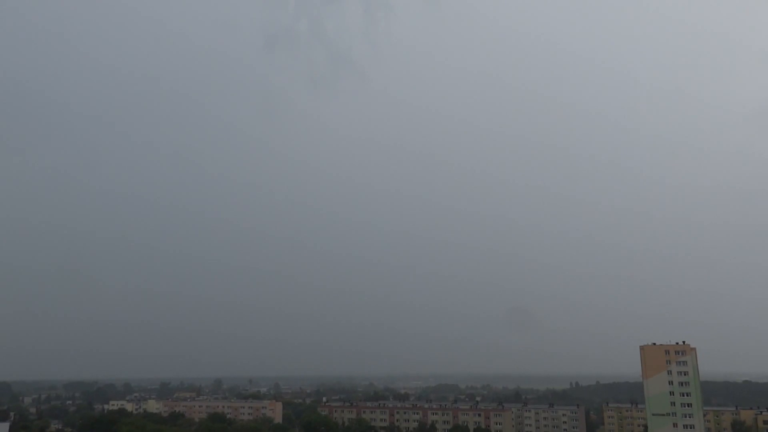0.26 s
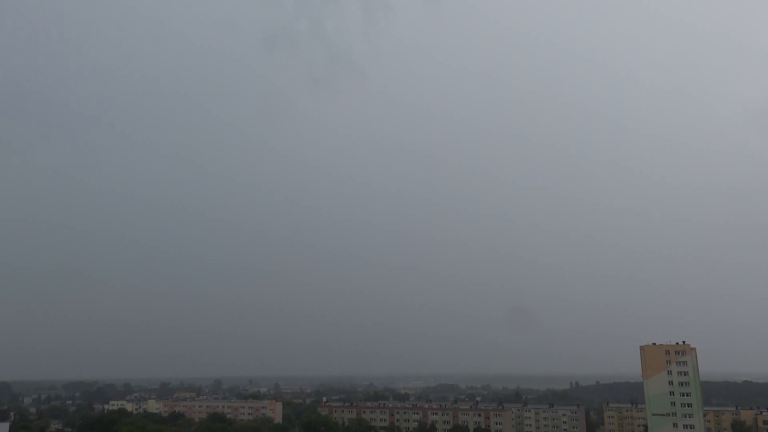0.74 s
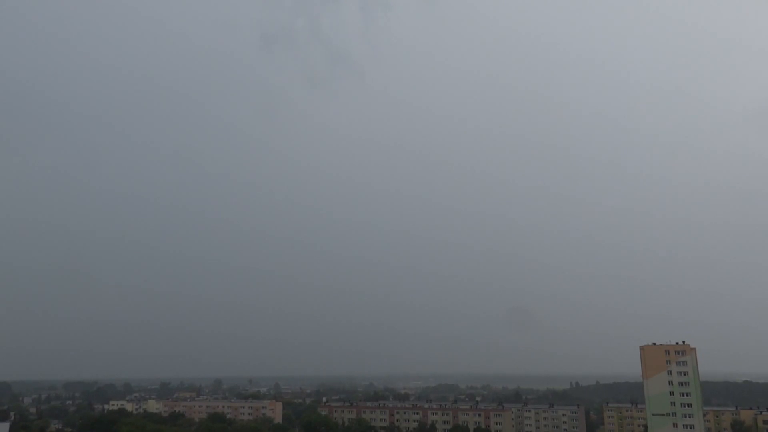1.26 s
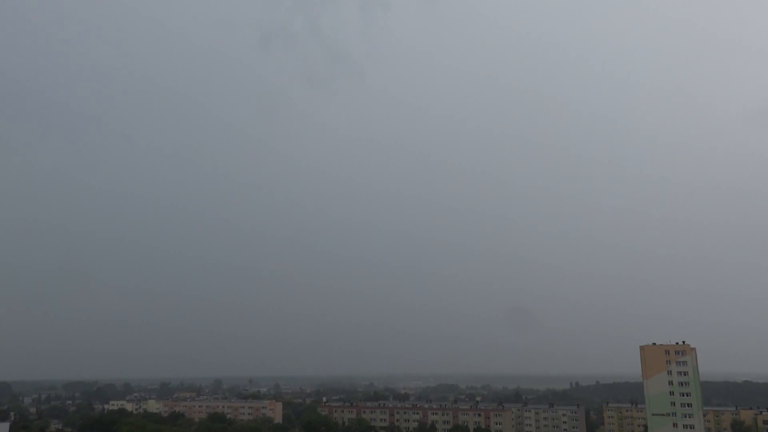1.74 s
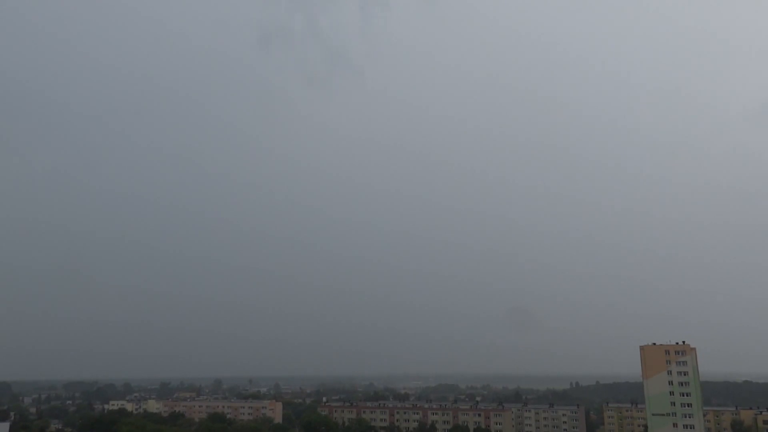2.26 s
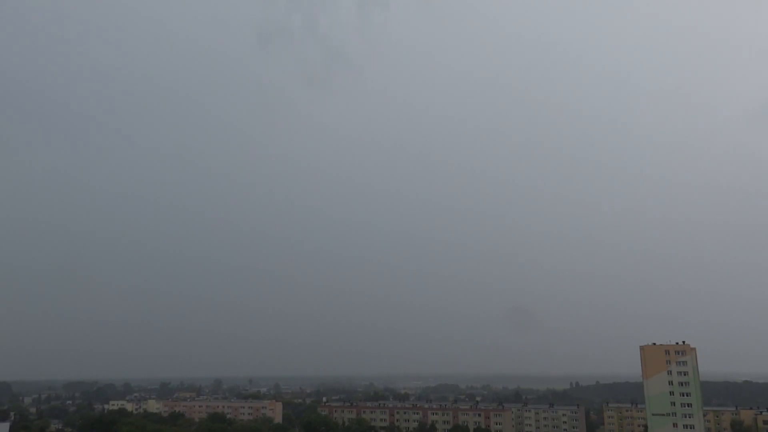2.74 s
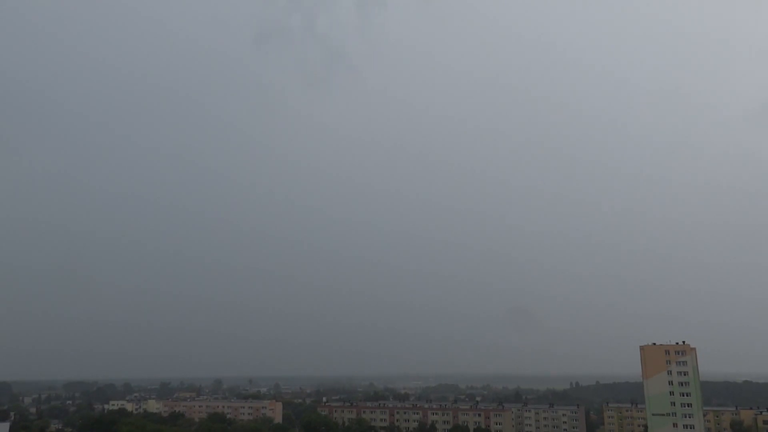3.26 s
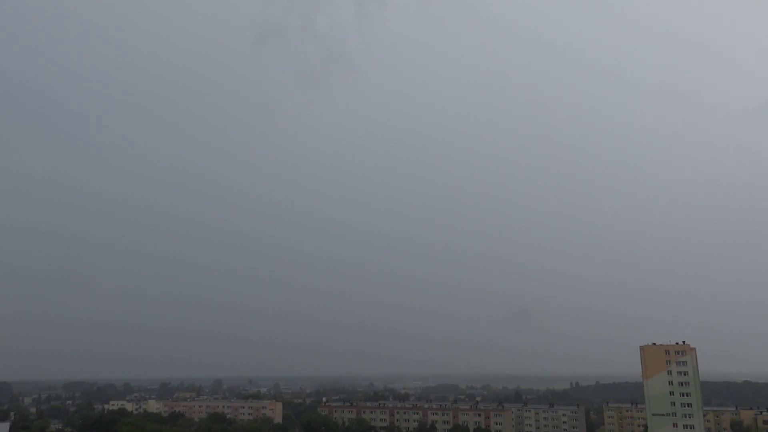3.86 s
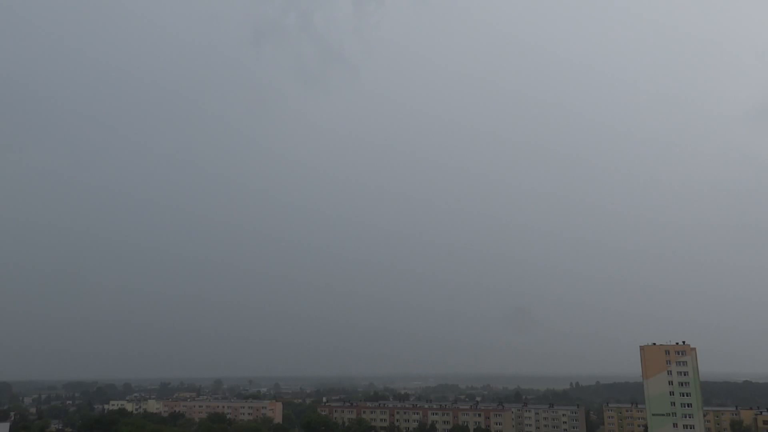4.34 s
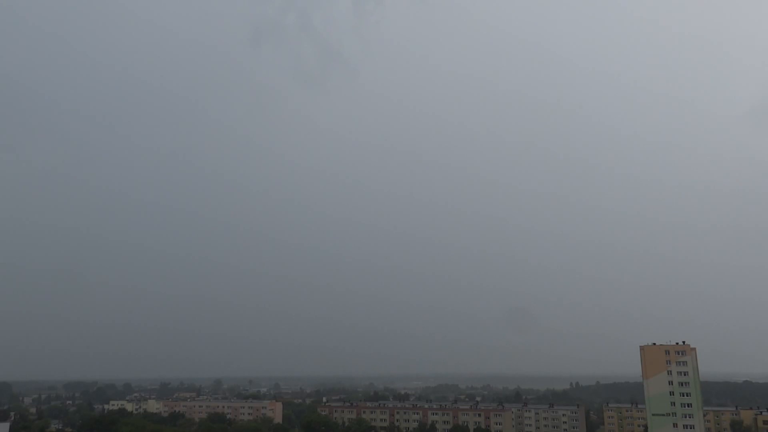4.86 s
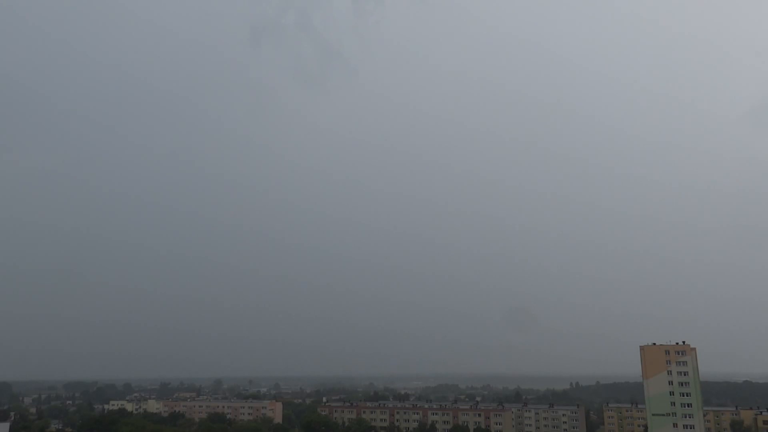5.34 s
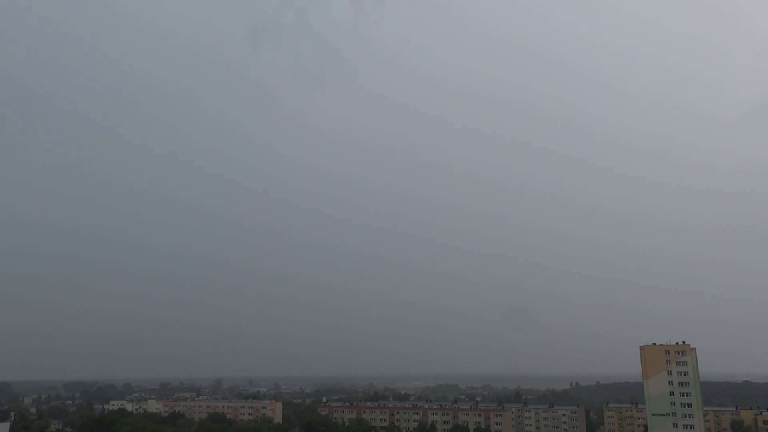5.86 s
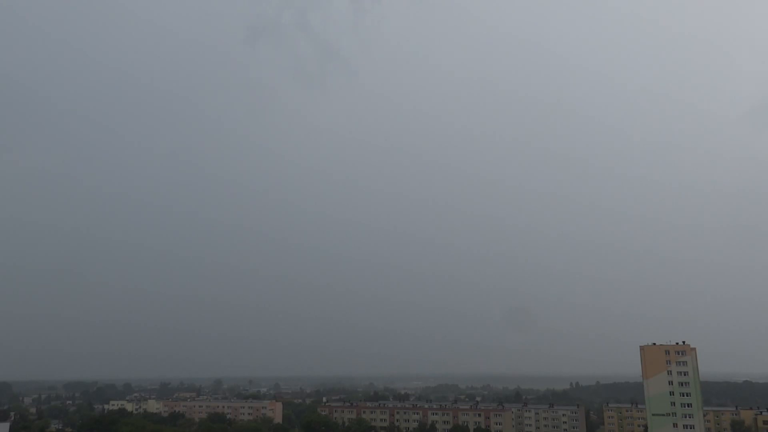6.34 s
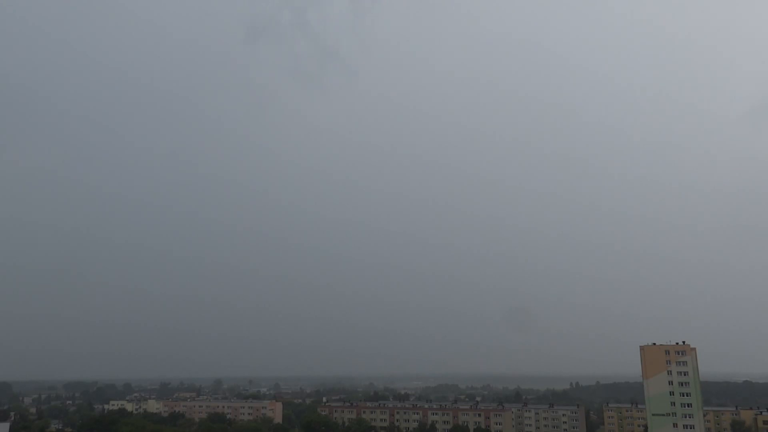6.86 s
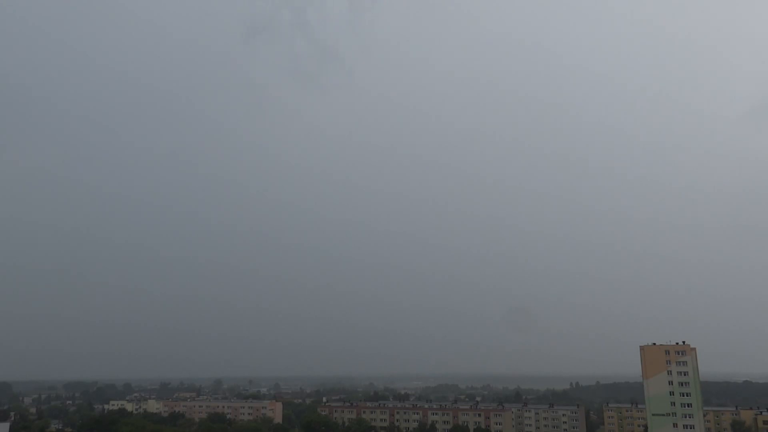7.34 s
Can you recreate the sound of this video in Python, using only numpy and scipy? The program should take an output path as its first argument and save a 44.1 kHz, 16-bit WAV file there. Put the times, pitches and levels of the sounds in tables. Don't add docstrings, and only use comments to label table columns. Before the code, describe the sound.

Rain hisses beyond a high balcony, close drops tick and thud on wet surfaces, and finally sharp thunder cracks and rolls.

```python
import sys
import numpy as np
from scipy import signal
from scipy.fft import rfft, irfft, next_fast_len
from scipy.io import wavfile
from scipy.ndimage import uniform_filter1d, map_coordinates

SR = 44100
rng = np.random.default_rng(int(sys.argv[2]) if len(sys.argv) > 2 else 0)


def inscribe(sig):
    pcm = np.round(np.clip(np.atleast_2d(sig).T, -1, 1) * 32767)
    wavfile.write(sys.argv[1], SR, pcm.astype(np.int16))


def gain_from_db(level_db):
    decades = np.asarray(level_db, float) / 20
    return 10 ** decades


N = 334719


def unit(x):
    return x / np.sqrt(np.mean(x ** 2) + 1e-20)


def peak(rows):
    return rows / np.abs(rows).max(axis=1, keepdims=True)


def along(points, hz):
    f, v = np.transpose(points)
    return np.interp(np.log(hz + 1), np.log(f + 1), v)


def wobble(rate):
    knots = rng.standard_normal(int(N * rate / SR) + 4)
    return map_coordinates(knots, [np.arange(N) * rate / SR])


def flicker(shape, size):
    return uniform_filter1d(rng.standard_normal(shape), size=size, axis=-1) * np.sqrt(size)


def coloured(x, spectrum):
    cepstrum = irfft(np.log(gain_from_db(along(spectrum, np.fft.rfftfreq(4096, 1 / SR))) + 1e-6))
    cepstrum[1:2048] *= 2
    cepstrum[2049:] = 0
    kernel = irfft(np.exp(rfft(cepstrum)))
    kernel = kernel[None] / np.linalg.norm(kernel)
    return signal.fftconvolve(np.atleast_2d(x), kernel, axes=1)[:, :x.shape[-1]]


def spread(pair, alike):
    m = next_fast_len(N)
    angle = np.arccos(np.clip(along(alike, np.fft.rfftfreq(m, 1 / SR)), -1, 1)) / 2
    mid, side = irfft(rfft(pair, m) * [np.cos(angle), np.sin(angle)], m)[:, :N]
    return np.array([mid + side, mid - side])


def pelting(per_s, scatter_db, share, patchy_db):
    hits = (rng.random((2, N)) < per_s / SR) * gain_from_db(scatter_db * rng.standard_normal((2, N)))
    hits = hits * rng.choice([-1, 1], (2, N))
    mixed = np.sqrt(share) * unit(hits) + np.sqrt(1 - share) * rng.standard_normal((2, N))
    z = signal.stft(mixed, nperseg=512)[2]
    field = uniform_filter1d(rng.standard_normal(z.shape[1:]), size=5, axis=0)
    field = uniform_filter1d(field, size=8, axis=1)
    return signal.istft(z * gain_from_db(patchy_db * unit(field)), nperseg=512)[1][:, :N]


def place(rows, starts):
    at = np.round(starts * SR).astype(int)[:, None] + np.arange(rows.shape[1])
    return np.bincount(at.ravel(), rows.ravel(), N + SR)[:N]


def rain():
    # [t/s, level/dB]
    strength = [(0.0, -40), (0.75, -40.5), (1.07, -40.5), (1.17, -38.5), (1.91, -38.5), (2.26, -39),
                (3.01, -39), (3.46, -41), (3.94, -39.5), (4.35, -38.5), (4.74, -37), (5.45, -38),
                (6.01, -37.5), (6.4, -38)]
    # [f/Hz, level/dB per Hz]
    patter_spectrum = [(15, -60), (40, -26), (100, -30), (160, -17.5), (250, -12), (400, -8), (630, -3.5),
                       (1000, -0.5), (1600, -3), (2500, -5), (4000, -12.5), (5000, -20), (7000, -43.5),
                       (15800, -42), (15950, -110)]
    # [f/Hz, level/dB per Hz]
    spray_spectrum = [(1500, -44), (3000, -9.5), (4700, -9), (5500, -10), (8100, -10), (10000, -12.5),
                      (12300, -28), (15000, -36), (15800, -44), (15950, -110)]
    # [f/Hz, likeness/1]
    likeness = [(60, 0.99), (150, 0.98), (380, 0.97), (950, 0.9), (2380, 0.77), (5980, 0.88), (15000, 0.82)]
    t = np.arange(N) / SR
    patter_db = np.interp(t, *np.transpose(strength))
    spray_db = -45.5 + 0.29 * (patter_db - patter_db.mean()) + 0.18 * t
    gust_s, gust_width_s, gust_db = 6.75, 0.45, 3
    spray_db = spray_db + gust_db * np.exp(-((t - gust_s) / gust_width_s) ** 4)
    patter = unit(coloured(pelting(900, scatter_db=2.0, share=0.24, patchy_db=0.52), patter_spectrum))
    spray = unit(coloured(pelting(1500, scatter_db=-3, share=0.22, patchy_db=0.97), spray_spectrum))
    breeze_db, flurry_db = .3 * wobble(7), .45 * wobble(14)
    patter = gain_from_db(patter_db + 0.5 + breeze_db + flurry_db) * patter
    spray = gain_from_db(spray_db + 0.5 + 0.81 * breeze_db) * spray
    return spread(patter + spray, likeness)


def drops():
    # [t/s, smack peak/dB, ring f/Hz, thud peak/dB, splash level/dB]
    sill_drops = [(.6826, -21.5, 6960, -29, -35), (.7426, -27, 6580, -34, -39),
                  (1.9618, -23.5, 6340, -34, -39), (1.9974, -20.5, 7670, -39, -32),
                  (2.8499, -23, 8130, -23.5, -32), (2.9067, -26, 4500, -22, -37),
                  (2.9639, -22, 6850, -28, -32), (2.9971, -33, 7000, -22, -34.5),
                  (3.1983, -19.5, 6970, -24, -31), (3.2397, -19, 6500, -22, -35),
                  (3.5004, -24, 6360, -21.5, -38), (3.5634, -18.5, 6940, -22, -36),
                  (3.7999, -29, 6750, -27, -38), (3.842, -18, 7600, -24, -26.5),
                  (3.8511, -17, 6960, -25, -49), (4.4769, -21, 6500, -25, -37),
                  (4.805, -17, 7600, -20.5, -33), (4.8961, -26.5, 7860, -25, -51),
                  (5.0674, -27, 7860, -33, -39), (5.1946, -20, 7700, -27, -36),
                  (5.3905, -21, 5760, -26, -35)]
    # [t/s, smack peak/dB, ring f/Hz, splash level/dB]
    railing_ticks = [(0.479, -29, 8200, -47), (0.4913, -23, 7640, -38), (1.8288, -22.5, 6350, -37),
                     (2.185, -27.5, 7000, -44), (2.809, -25.5, 7430, -43.5), (3.2586, -29, 7260, -31.5),
                     (3.4572, -30, 8060, -46), (3.754, -25, 5460, -30), (4.797, -30, 6200, -67),
                     (4.9347, -27, 6500, -50), (5.3175, -26, 8900, -37), (0.904, -34, 6800, -53),
                     (2.763, -38, 11000, -53), (5.5423, -31, 5200, -60), (6.3217, -31, 8100, -59),
                     (6.6613, -28, 6550, -47), (7.1229, -27, 5600, -36), (7.134, -28, 5740, -31.5),
                     (7.166, -36, 12500, -46), (7.192, -22.5, 8900, -36), (7.215, -33, 6500, -38),
                     (7.309, -35.5, 7300, -51), (7.5663, -33, 6600, -34)]
    # [t/s, smack peak/dB, thud peak/dB]
    film_plops = [(0.3532, -39, -52), (.4371, -31, -26), (0.66, -27.5, -31), (1.2401, -32, -22),
                  (1.2612, -34, -25), (1.3281, -33, -24), (1.465, -42, -30), (1.5022, -27, -29),
                  (1.6135, -33, -23), (1.6594, -44, -23), (1.8818, -31, -32), (1.9063, -31, -26),
                  (2.2684, -35, -32), (2.3566, -29, -20), (2.452, -35, -30), (2.5006, -28.5, -28),
                  (2.9265, -26, -27), (3.1568, -36, -30), (3.6002, -30, -24), (3.6297, -32, -28),
                  (3.916, -40, -25), (3.956, -29, -25), (4.033, -31, -28), (4.0986, -36, -43),
                  (4.4374, -32, -27), (4.5895, -28.5, -23), (4.625, -31, -28), (5.0862, -32, -23),
                  (5.591, -47, -44), (5.62, -42, -30)]
    # [f/Hz, level/dB]
    smack_spectrum = [(300, -34), (1500, -20), (4000, -6), (5200, -7.5), (6500, 4.5), (8000, -0.5),
                      (10500, -3), (12700, -24), (16500, -75)]
    # [f/Hz, level/dB]
    bright_spectrum = [(300, -20), (1000, -10), (4000, -3.5), (5000, -7), (6200, -0.5), (8000, -4.5),
                       (10000, -3), (12700, -22), (14700, -17), (15800, -36), (16000, -96)]
    # [f/Hz, level/dB]
    thud_spectrum = [(60, -68), (300, -11), (700, -0.5), (1200, 4.5), (2700, 0), (4000, -10), (8000, -13),
                     (13000, -42), (16000, -88)]
    ticks = [(s, db, hz, db - 9, splash_db) for s, db, hz, splash_db in railing_ticks]
    plops = [(s, db, 6500 * np.exp(rng.normal(0, 0.087)), thud_db, db - 11)
             for s, db, thud_db in film_plops]
    rows = list(sill_drops) + ticks + plops
    s, smack_db, hz, thud_db, bright_db = np.transpose(rows)[:, :, None]
    dull_db = -39.5 + 0.48 * (thud_db + 24.5)
    t = np.arange(SR // 6) / SR
    shape = (len(s), len(t))

    blow = np.exp(-t / .0013) * (1 - np.exp(-t / .0001))
    ring = 1.1 * np.sin(2 * np.pi * hz * t) + .6 * np.sin(2 * np.pi * 1.22 * hz * t)
    smack = blow * (coloured(rng.standard_normal(shape), smack_spectrum) + ring)
    smack = gain_from_db(smack_db + 2.6) * peak(smack)
    push = 3 * (t == 0) + blow * rng.standard_normal(shape)
    thud = gain_from_db(thud_db + 1.6) * peak(coloured(push, thud_spectrum))

    droplets = rng.standard_normal(shape) * gain_from_db(2.5 * flicker(shape, 40))
    droplets = droplets * gain_from_db(-60 * t / 0.21) * (1 - np.exp(-t / 0.0027))
    splash = gain_from_db(bright_db - 3.5) * coloured(droplets, bright_spectrum)
    splash = splash + gain_from_db(dull_db + 0.3) * coloured(droplets, thud_spectrum)
    pan_db = rng.normal(0, 1.0, s.shape)
    whole = smack + thud + splash
    return np.array([place(whole * gain_from_db(side * pan_db), s[:, 0]) for side in (1, -1)])


def fizz():
    # [t/s, peak/dB]
    puffs = [(0.3536, -49), (0.4359, -51), (0.4778, -56), (0.4908, -45), (0.6579, -43), (0.6818, -44),
             (0.7417, -43), (0.9033, -50), (1.8277, -50), (1.9604, -49), (1.9964, -41), (2.1834, -47),
             (2.3555, -47.5), (2.8085, -48), (2.8489, -40), (2.9632, -40), (2.9961, -42), (3.1976, -36.5),
             (3.2385, -37), (3.4999, -41), (3.5628, -41), (3.7529, -45), (3.8412, -28), (4.4757, -47),
             (4.805, -46), (4.805, -42), (4.9337, -46), (5.1936, -47.5), (5.3896, -44), (6.6588, -41),
             (7.1641, -37)]
    # [f/Hz, level/dB]
    puff_spectrum = [(9000, -49), (12500, -4.5), (14700, 0), (15800, -4), (16600, -16)]
    s, db = np.transpose(puffs)[:, :, None]
    t = np.arange(SR // 40) / SR
    puff = coloured(rng.standard_normal((len(s), len(t))), puff_spectrum)
    puff = puff * np.exp(-t / .002) * (1 - np.exp(-t / .0002))
    return place(gain_from_db(db - 2.0) * peak(puff), s[:, 0] + .0008)


def spatter():
    # [t/s, peak/dB, f/Hz]
    mid_clicks = [(0.682, -27, 2370), (0.742, -19, 1910), (1.239, -28, 2490), (1.333, -21, 1800),
                  (1.6211, -25, 2040), (1.7579, -19, 1800), (1.9958, -30, 2570), (2.3549, -34, 1840),
                  (2.5001, -24, 2300), (2.848, -19, 2410), (2.9047, -28, 2200), (2.9259, -26, 2310),
                  (2.963, -24, 2210), (2.9961, -25, 3000), (3.1977, -31, 2280), (3.2391, -33, 2280),
                  (3.562, -24, 2490), (3.5996, -33, 2220), (3.7598, -27, 3640), (3.8495, -27, 2660),
                  (3.9633, -20, 2650), (4.4756, -18, 2310), (4.5887, -34, 1910), (4.7525, -28, 1820),
                  (4.8035, -18, 2800), (5.389, -29, 2920)]
    s, db, hz = np.transpose(mid_clicks)[:, :, None]
    t = np.arange(SR // 40) / SR
    rough = coloured(rng.standard_normal((len(s), len(t))),
                     [(600, -34), (1800, 2), (4500, 2), (8000, -25), (16000, -88)])
    click = .8 * np.sin(2 * np.pi * hz * t) + rough
    click = click * np.exp(-t / .003) * (1 - np.exp(-t / .0002))
    return place(gain_from_db(db - 4.5) * peak(click), s[:, 0])


def surges():
    # [t/s, boom level/dB, crackle over boom/dB, rise/s]
    stretches = [(6.436, -36, -1, 0.025), (6.505, -40, 3, 0.026), (6.565, -29.5, -10, 0.035),
                 (6.6, -27, -2, 0.02), (6.645, -22, 3, 0.029), (6.72, -27, 3.5, 0.052),
                 (6.798, -15.5, -2.5, 0.016), (6.865, -22.5, 3, 0.021), (6.946, -15, -5, 0.022),
                 (7.04, -30, 5, 0.028), (7.07, -18.5, -3, 0.053), (7.11, -26.5, 5, 0.015),
                 (7.159, -19.5, -2.5, 0.059), (7.249, -17.5, 0, 0.026), (7.309, -18.5, -0.5, .014),
                 (7.37, -17.5, -7, 0.037), (7.427, -23, 5, 0.011), (7.536, -16.5, -5.5, 0.027),
                 (7.575, -27.5, 3, 0.012)]
    s, boom_db, crackle_db, rise = np.transpose(stretches)[:, :, None]
    t60 = np.clip(0.56 * gain_from_db(-0.91 * (boom_db + 13)), .1, .4)
    t = np.arange(SR // 2) / SR
    shape = np.sin(np.pi / 2 * np.clip(t / rise, 0, 1)) * gain_from_db(-60 * np.maximum(t - rise, 0) / t60)
    return [np.sqrt(place((gain_from_db(db) * shape) ** 2, s[:, 0])) for db in (boom_db, boom_db + crackle_db)]


def thunder():
    # [t/s, level/dB, f/Hz]
    peal_shocks = [(6.67, -15, 780), (6.68, -9, 374), (6.733, -11, 842), (6.798, -6, 371),
                   (6.805, -5, 561), (6.81, -10, 1206), (6.812, -18, 904), (6.832, -14, 381),
                   (6.84, -28, 770), (6.865, -13, 220), (6.867, -18, 764), (6.952, -8, 728),
                   (6.965, -6, 398), (7.069, -6.5, 216), (7.077, -7.5, 359), (7.107, -8.5, 964),
                   (7.109, -9, 363), (7.117, -14, 1170), (7.137, -11, 979), (7.147, -7, 539),
                   (7.167, -11, 183), (7.172, -0.5, 357.5), (7.174, -11, 983), (7.182, -6, 757),
                   (7.192, -11, 1155), (7.259, -9, 361), (7.266, -23, 835), (7.274, -7.5, 191),
                   (7.311, -8, 363), (7.314, -1, 768), (7.317, -2.5, 914), (7.324, -11, 1196),
                   (7.326, -4, 553), (7.336, -7.5, 194), (7.349, -7, 900), (7.354, -7, 1155),
                   (7.391, 2, 552), (7.396, -7, 354), (7.409, -8, 200), (7.416, -8, 793),
                   (7.436, -1, 559), (7.439, -5, 789), (7.446, -22, 364), (7.464, -18, 207),
                   (7.548, -10, 370)]
    # [t/s, level/dB, f/Hz]
    further_shocks = [(6.44, -26, 369), (6.44, -29, 993), (6.505, -26, 209), (6.435, -27.5, 193), (6.579, -32, 110),
                      (6.659, -34, 126), (6.568, -26, 359), (6.6, -18, 339), (6.645, -11, 339), (6.655, -24, 766),
                      (7.2, -10, 358), (7.465, -8, 553), (7.543, -12, 516)]
    # [f/Hz, level/dB per Hz]
    boom_spectrum = [(15, -52), (37, -32), (54, -31), (80, -19.5), (123, -16), (160, -5.5), (204, -2),
                     (297, -5.5), (361, 0), (413, 1.5), (557, -1.5), (619, -8), (900, -22), (1980, -120)]
    # [f/Hz, level/dB per Hz]
    crackle_spectrum = [(350, -18), (600, -8), (800, 1), (1000, -3), (1300, -4), (1600, -8.5),
                        (2000, -14.5), (2500, -23.5), (3500, -55), (6000, -87)]
    boom, crackle = surges()
    shocks = pelting(900, scatter_db=3, share=.35, patchy_db=1)
    roll = boom * unit(coloured(shocks, boom_spectrum))
    roll = roll + crackle * unit(coloured(shocks, crackle_spectrum))
    roll = gain_from_db(-4.5) * spread(roll, [(40, 0.93), (120, .999), (300, 1.0), (1000, 1.0), (2500, 1.0)])

    s, db, hz = np.transpose(list(peal_shocks) + list(further_shocks))[:, :, None]
    t = np.arange(SR // 8) / SR
    shake = flicker((len(s), len(t)), 120)
    wave = np.sin(2 * np.pi * np.cumsum(hz * (1 + 0.054 * shake), axis=1) / SR)
    length_s = 0.058 * (500 / hz) ** .4
    swell = np.sin(np.pi * np.clip(t / length_s, 0, 1) ** 0.33)
    peals = place(wave * gain_from_db(db - 12.0) * swell, s[:, 0])
    return roll, coloured(peals, [(60, -55), (110, -0.2), (20000, 2.5)])[0]


def cracks():
    # [t/s, peak/dB]
    fronts = [
        (6.606, -26),
        (6.797, -7),
        (6.806, -6),
        (6.946, -7),
        (7.169, -5),
        (7.282, -11),
        (7.301, -8),
        (7.324, -9),
        (7.328, -10),
        (7.402, -14),
    ]
    s, db = np.transpose(fronts)[:, :, None]
    u = np.arange(SR // 50) / SR / 0.00049
    front = coloured((1 - u) * np.exp(-u), [(80, -33), (400, 1.5), (1500, -6), (3000, -29), (6000, -66)])
    return place(gain_from_db(db - 2.5) * rng.choice([-1, 1], s.shape) * peak(front), s[:, 0])


def gurgles():
    # [t/s, level/dB, f/Hz]
    bubbles = [(1.145, -39, 980), (1.312, -34, 3130), (1.314, -35, 1260), (1.322, -28.5, 550),
               (1.328, -30, 1640), (1.422, -35, 1140), (1.492, -38, 730), (1.601, -39, 717),
               (1.606, -35, 2100), (1.739, -33, 753), (1.758, -30, 1280), (1.951, -33, 721),
               (1.983, -33, 1480), (1.983, -40, 825), (1.99, -34, 1090), (2.003, -41, 1350),
               (2.837, -35, 1383), (2.846, -36, 1012), (2.893, -38, 1290), (2.896, -34, 2230),
               (2.953, -42, 1350), (2.961, -34, 2220), (2.968, -33, 1167), (3.163, -36, 1320),
               (3.168, -33, 870), (3.175, -37, 1100), (3.23, -41, 1190), (3.558, -39, 2500),
               (3.587, -34, 1170), (3.592, -37, 920), (3.84, -38, 2700), (3.907, -33.5, 936),
               (3.946, -34, 490), (4.028, -29.5, 667), (4.029, -27, 1133), (4.036, -32, 925),
               (4.208, -32.5, 665), (4.218, -27.5, 1194), (4.442, -33, 1308), (4.467, -34, 1140),
               (4.472, -41.5, 2334), (4.789, -36, 790), (4.79, -38, 1100), (4.792, -45, 2465),
               (4.792, -41, 1765), (4.792, -39, 1580), (4.803, -41, 2788), (4.805, -34.5, 1245),
               (4.809, -37, 670), (4.836, -37, 910), (4.839, -32, 768), (4.856, -32, 1073),
               (4.886, -35, 1520), (5.077, -34, 1215), (5.186, -34, 777), (5.727, -37, 611),
               (5.732, -77, 1040), (5.954, -38, 484)]
    s, db, hz = np.transpose(bubbles)[:, :, None]
    glide = 0.032 * rng.standard_normal(s.shape)
    t = np.arange(SR // 8) / SR
    u = t / 0.03
    shake, flutter = flicker((2, len(s), len(t)), 200)
    pitch = hz * (1 + glide * np.minimum(u, 1) + 0.03 * shake)
    phase = 2 * np.pi * np.cumsum(pitch, axis=1) / SR
    swell = np.sin(np.pi * np.clip(u, 0, 1) ** 0.72)
    return place(gain_from_db(db - 6.0 + 1.6 * flutter) * swell * np.sin(phase), s[:, 0])


def sloshes():
    # [t/s, level/dB, length/s]
    bursts = [(1.122, -38.5, 0.024), (1.147, -37.5, 0.035), (1.318, -38, 0.033), (1.412, -45, 0.043),
              (1.746, -34, 0.029), (1.881, -41, .05), (1.995, -35, 0.028), (2.912, -45, 0.038),
              (2.971, -38, 0.047), (3.157, -40, 0.073), (4.028, -35, 0.032), (4.058, -45, 0.037),
              (4.07, -43, .022), (4.091, -37.5, 0.0092), (4.212, -36.5, 0.044), (4.25, -42, 0.033),
              (4.6, -40, 0.096), (5.069, -39, 0.04), (5.732, -41, .03), (5.949, -42, 0.031)]
    # [f/Hz, level/dB]
    water_spectrum = [(250, -35), (500, -5), (700, -2.5), (1250, 1.5), (1700, -9), (3000, -10), (6000, -50),
                      (16000, -100)]
    s, db, length = np.transpose(bursts)[:, :, None]
    t = np.arange(SR // 8) / SR
    shape = (len(s), len(t))
    grains = rng.standard_normal(shape) * gain_from_db(2.9 * flicker(shape, 90))
    swell = np.sin(np.pi * np.clip(t / length, 0, 1) ** 0.72)
    return place(gain_from_db(db) * swell * coloured(unit(grains), water_spectrum), s[:, 0])


def hum():
    # [centre t/s, width/s, level/dB]
    swells = [(1.35, 0.13, -77), (2.35, 0.14, -74), (2.8, 0.22, -76.5), (3.33, 0.17, -66), (3.72, .12, -69),
              (4.15, .07, -70), (4.53, .12, -70), (4.88, 0.18, -65), (5.5, 0.057, -69), (5.75, 0.082, -70),
              (6.12, .15, -76)]
    t = np.arange(N) / SR
    upper = gain_from_db(-77) + sum(gain_from_db(db) * np.exp(-((t - s) / width) ** 2) for s, width, db in swells)
    step_db = 3 * np.clip((t - 5.0) / .3, 0, 1)
    lower = gain_from_db(-85 + step_db + 3.2 * wobble(9))
    phase = 2 * np.pi * np.cumsum(43.1 + .5 * wobble(3.37)) / SR
    return gain_from_db(-0.5) * upper * np.sin(2 * phase) + gain_from_db(5.0) * lower * np.sin(phase)


def balcony(x):
    # [f/Hz, t60/s]
    decay = [(150, 0.58), (1000, 0.56), (5000, 0.15), (12000, 0.025)]
    hz, t, z = signal.stft(rng.standard_normal((2, SR // 3)), SR, nperseg=256)
    tail = signal.istft(z * gain_from_db(-60 * t / along(decay, hz)[:, None]), SR, nperseg=256)[1]
    tail = tail / np.linalg.norm(tail[0])
    late = np.pad(x, (120, 0))[None]
    pair = signal.fftconvolve(late, tail, axes=1)[:, :N]
    return spread(pair, [(150, .999), (500, 0.98), (2000, 0.83), (8000, 0.16)])


def scene():
    roll, peals = thunder()
    sill = drops()
    drain = gurgles() + sloshes()
    sweep = np.pi * 2.3 * np.arange(N) / SR
    roll_echo = sum(balcony(roll.mean(axis=0) * turn(sweep)) for turn in (np.sin, np.cos))
    echoes = gain_from_db(-16.0) * balcony(sill.mean(axis=0))
    echoes = echoes + gain_from_db(-8.0) * balcony(drain + peals) + gain_from_db(-7.0) * roll_echo
    near = sill + fizz() + spatter() + drain
    return rain() + near + roll + peals + cracks() + hum() + echoes


def band_limit(x):
    return signal.sosfilt(signal.butter(12, 16520, fs=SR, output="sos"), x)


def record(dry):
    # [f/Hz, left up and right down/dB]
    balance = [(250, 0.027), (1300, .5), (4400, .25), (15000, 0)]
    m = next_fast_len(N + SR)
    hz = np.fft.rfftfreq(m, 1 / SR)
    band = (hz < 16520) / np.sqrt(1 + (41 / (hz + 1)) ** 8)
    tilt_db = along(balance, hz) * [[1], [-1]]
    spectrum = rfft(dry, m) * band
    before = irfft(spectrum, m)[:, :N]
    after = irfft(spectrum * gain_from_db(tilt_db), m)[:, :N]
    turned = np.clip((np.arange(N) / SR - 4.6) / .3, 0, 1)
    x = before + (after - before) * turned
    x = x / (1 + np.abs(x / .9) ** 4) ** (1 / 4)
    return band_limit(x)


dry = scene()
out = record(dry)
inscribe(out)
```